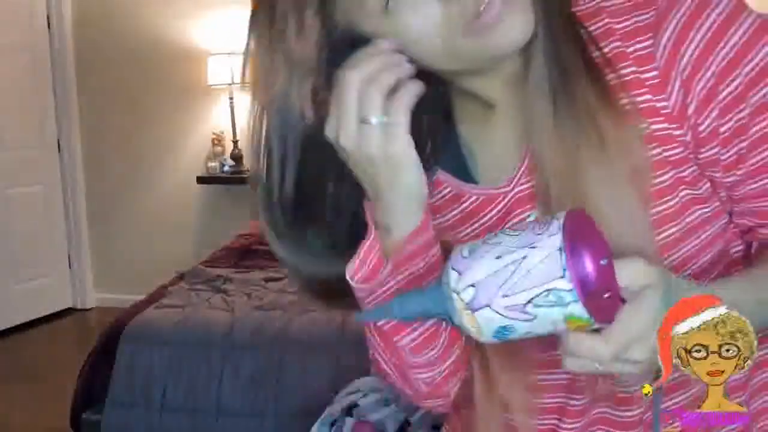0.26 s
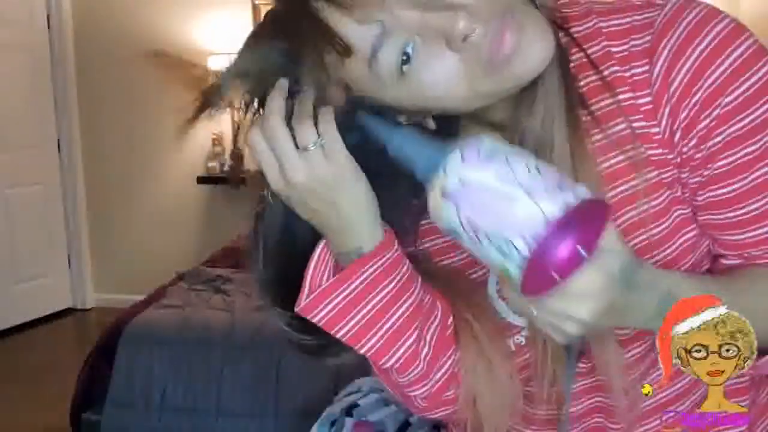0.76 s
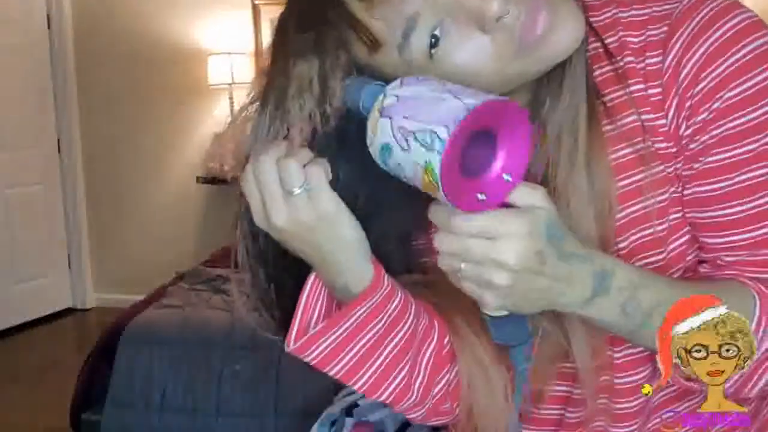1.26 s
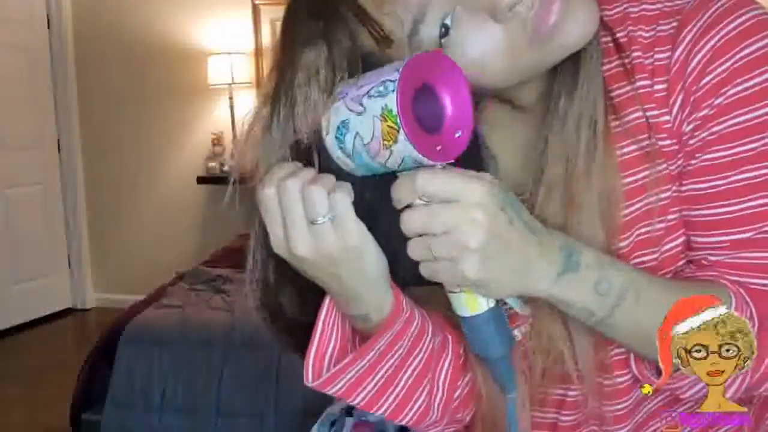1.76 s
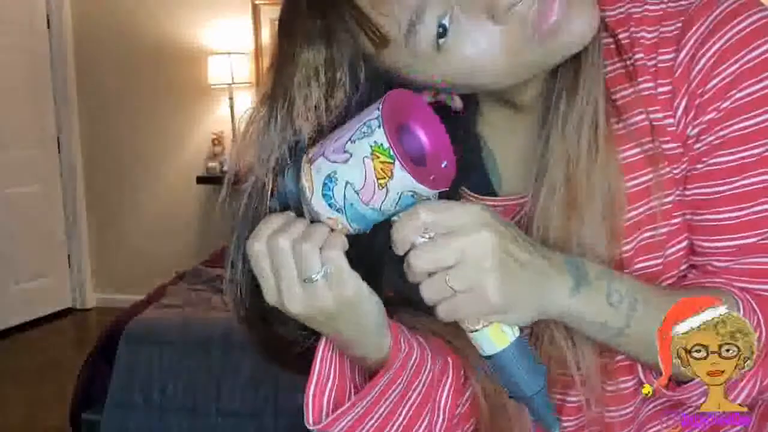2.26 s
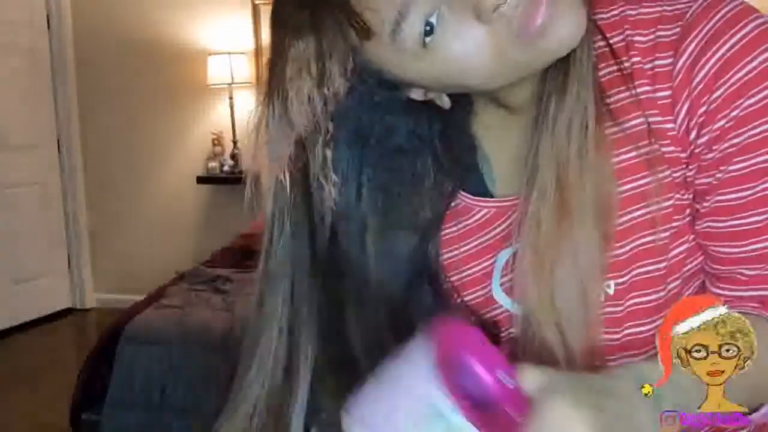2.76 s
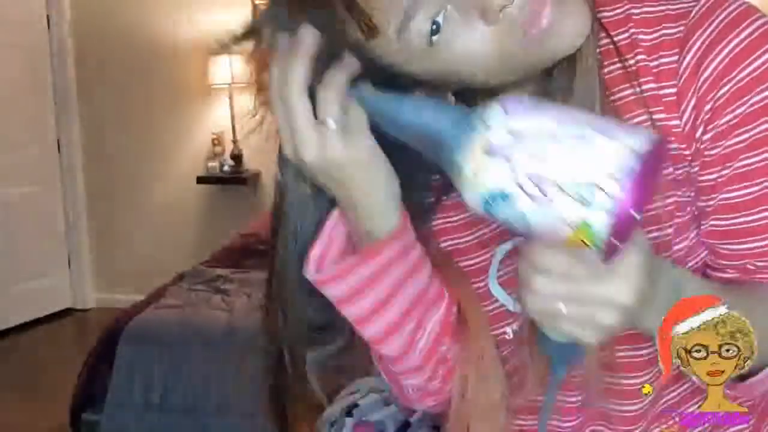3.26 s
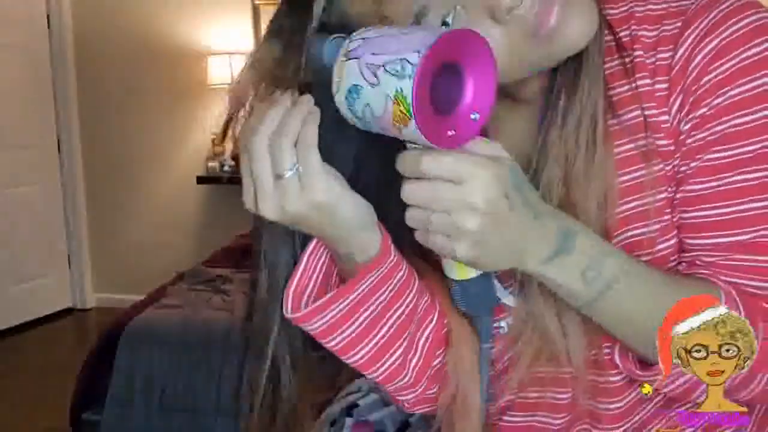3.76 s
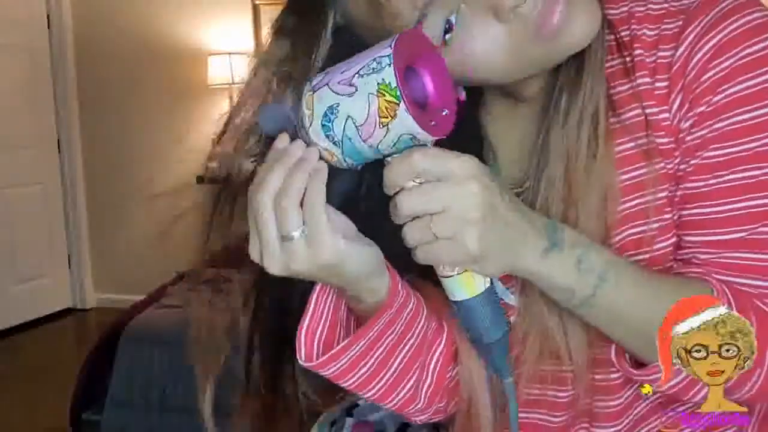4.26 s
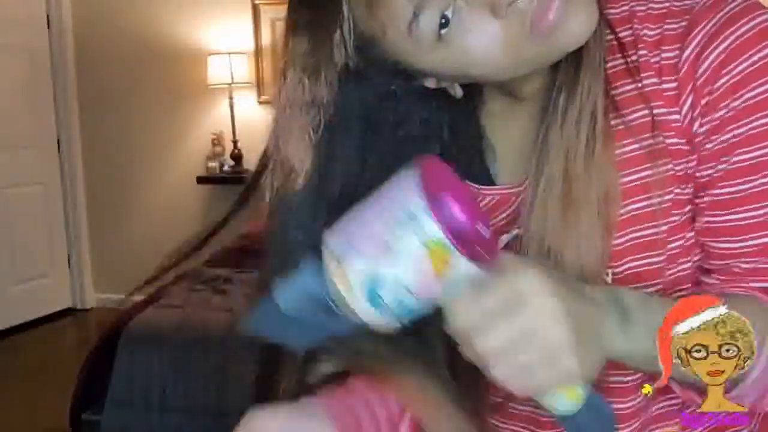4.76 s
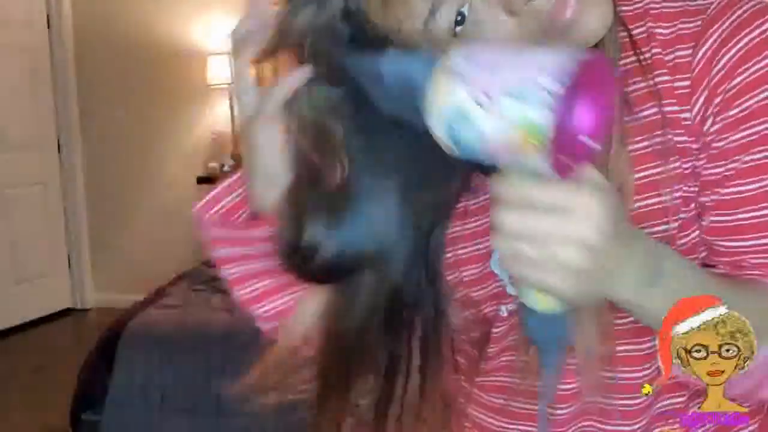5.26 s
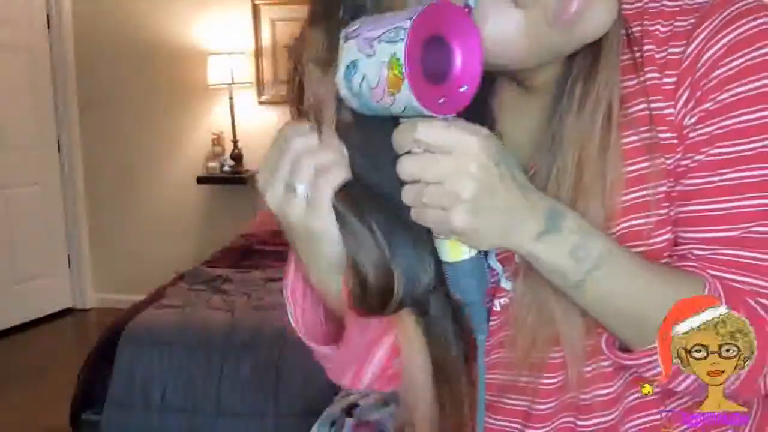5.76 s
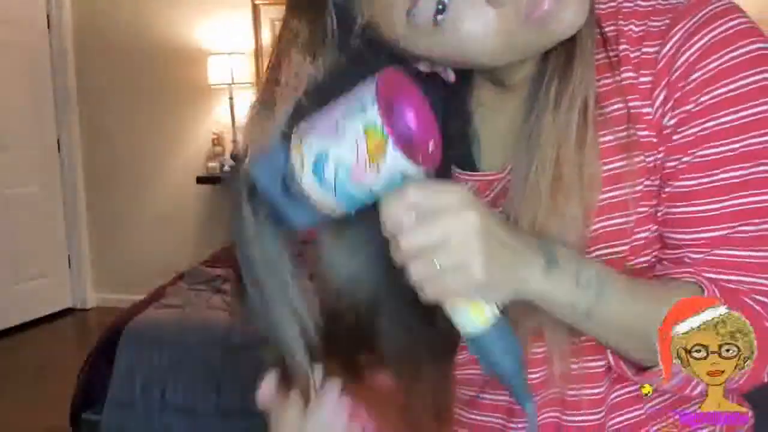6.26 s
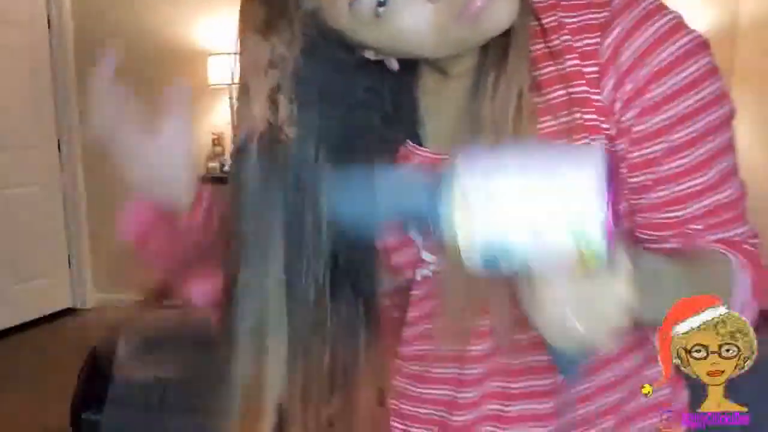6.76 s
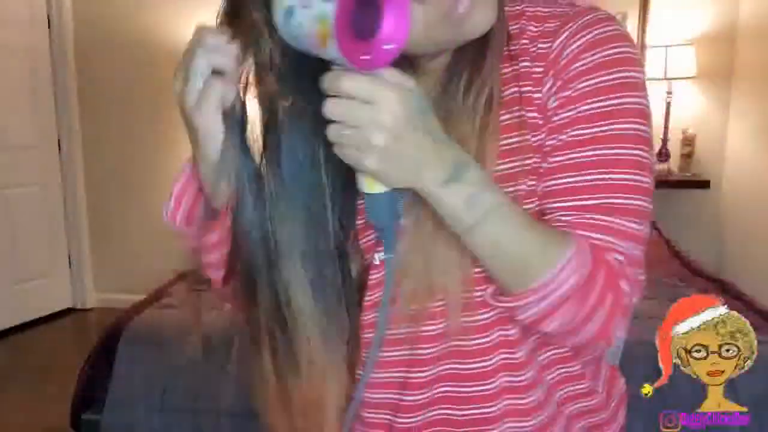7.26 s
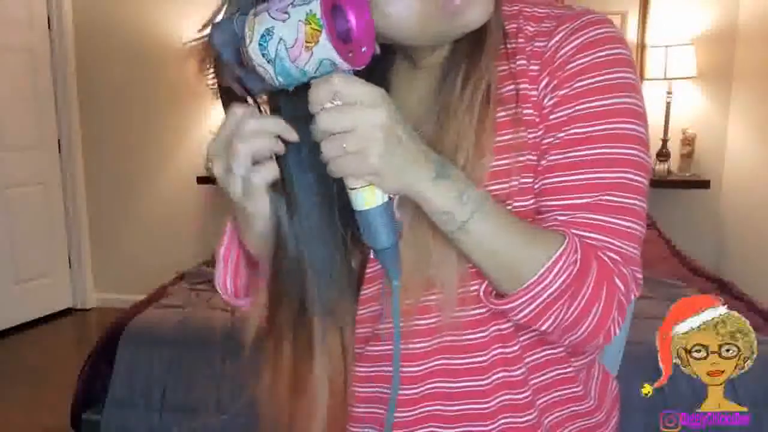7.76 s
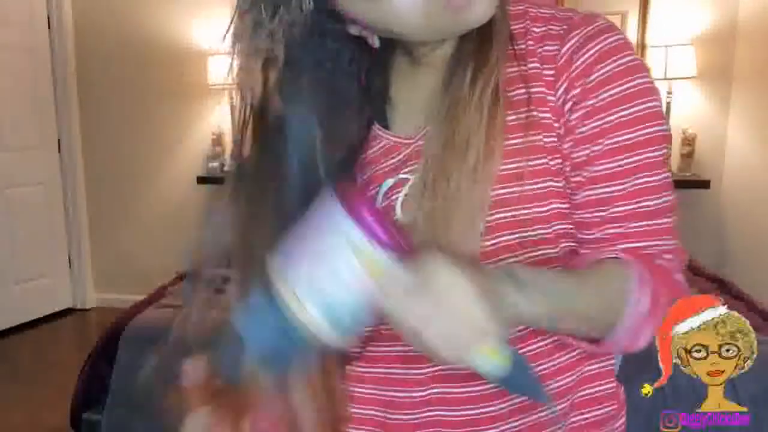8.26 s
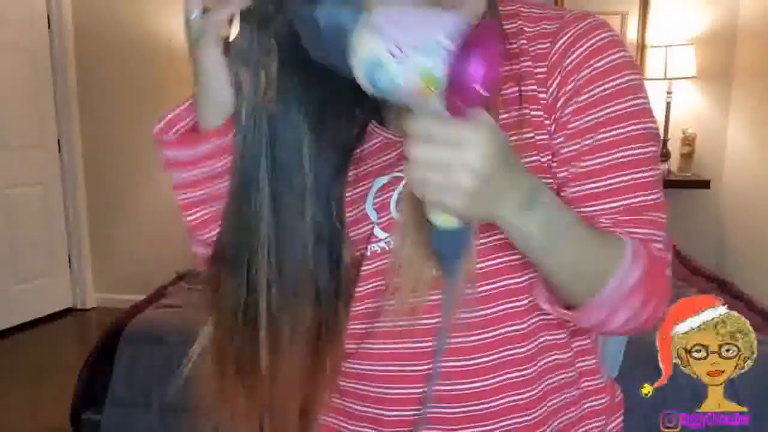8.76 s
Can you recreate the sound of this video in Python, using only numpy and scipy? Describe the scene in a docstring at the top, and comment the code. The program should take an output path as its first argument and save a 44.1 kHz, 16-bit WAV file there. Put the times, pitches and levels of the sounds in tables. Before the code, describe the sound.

A hair dryer clicks on with a quick rising chirp, then roars steadily close by, its hiss swelling as the nozzle sweeps past.

```python
"""A low rumble and drone are heard first, then a click and the chirp of a hair dryer being switched on.
Its motor runs up, whining at once, eight and twelve times its turning rate; turbulence roars in the duct
and swells as the nozzle is waved about a head of long hair in a soft bedroom. Shaped noise makes the air,
phase summed from motor speed makes the tones, and two microphone ports have each their treble colour."""
import sys
import numpy as np
from scipy import signal
from scipy.fft import rfft, irfft
from scipy.io import wavfile
from scipy.ndimage import map_coordinates

SR = 44100
rng = np.random.default_rng(int(sys.argv[2]) if len(sys.argv) > 2 else 0)


def store_wav(level_fs):
    """Save 16-bit WAV to argv[1]."""
    pcm = np.round(np.clip(np.atleast_2d(level_fs), -1, 1) * 32767)
    wavfile.write(sys.argv[1], SR, pcm.T.astype(np.int16))


N = 396900
TIME_S = np.arange(N) / SR
HZ = np.maximum(np.fft.rfftfreq(N, 1 / SR), 1)
SIDES = np.array([[1], [-1]])   # left, right


def amp(db):
    """Decibel law: twenty decibels are a tenfold amplitude."""
    return 10 ** (np.asarray(db) / 20)


def rms_one(x):
    """Normalisation: scale to a root-mean-square of 1."""
    return x / np.sqrt(np.mean(x ** 2) + 1e-20)


def in_time(rows):
    """Linear interpolation: the columns of a time table at every sample."""
    s, *columns = np.transpose(rows)
    return [np.interp(TIME_S, s, c) for c in columns]


def at_hz(points, hz):
    """Logarithmic pitch scale: a spectrum table read along log frequency."""
    table = np.array(points)
    return np.interp(np.log(hz), np.log(table[:, 0]), table[:, 1])


def drift(rate_hz):
    """Low-pass noise: a random fluctuation of spread 1, slowed by two equal poles."""
    r = np.exp(-80 * np.pi * rate_hz / SR)   # one step is 40 samples
    white = rng.standard_normal(N // 40 + 2002)
    slow = signal.lfilter([1], [1, -2 * r, r * r], white)[2000:]
    return np.interp(np.arange(N) / 40, np.arange(len(slow)), rms_one(slow))


def bell(hz, width_hz):
    """Resonance curve: 1 at the centre, half at the edges of the width."""
    return 1 / (1 + (2 * (HZ - hz) / width_hz) ** 2)


def resonate_twice(x, hz, width_hz):
    """Damped resonance: a pole pair rings at one frequency, applied twice for steeper skirts."""
    r = np.exp(-np.pi * width_hz / SR)
    for twice in range(2):
        x = signal.lfilter([1, 0, -1], [1, -2 * r * np.cos(2 * np.pi * hz / SR), r * r], x)
    return x


# coherence of the two ports: (frequency [Hz], left-right correlation [-1 to 1])
PORT_LIKENESS = [(60, 1), (120, 1), (240, 0.94), (480, 0.79), (950, 0.52), (1890, 0.37), (3770, 0.043),
                 (7520, 0.087), (15000, 0.01)]


def stereo_noise(colour_db):
    """Spatial coherence: spectra of two noises, alike in the bass and nearly unrelated in the treble."""
    mid, side = rfft(rng.standard_normal((2, N)))
    alike = np.clip(at_hz(PORT_LIKENESS, HZ), -1, .97)
    return amp(colour_db) * (np.sqrt(1 + alike) * mid + np.sqrt(1 - alike) * side * SIDES)


WAVING_HZ = 2.0   # how fast the pattern of reflections shifts


def reflections(x, t60_s, echo_db, count):
    """Reverberation: direct sound plus dying echo patterns, reweighted slowly as the dryer moves."""
    weights = np.array([drift(WAVING_HZ) for k in range(count)])
    weights = weights / np.sqrt(np.sum(weights ** 2, axis=0))
    decay = amp(-60 * TIME_S / t60_s)
    heard, out = rfft(x), x
    for weight in weights:
        echoes = irfft(stereo_noise(0), N) * decay
        response = rfft(echoes) / np.sqrt(2 * np.sum(decay ** 2))
        out = out + amp(echo_db) * weight * irfft(heard * response, N)
    return out / np.sqrt(1 + amp(2 * echo_db))


def tone(phase, level_db, fade_db, rate_hz, left_db, lead_rad=0):
    """Multipath interference: strength and phase waver in each port as the paths through the room change."""
    ports = []
    for side in SIDES:
        strength = amp(fade_db * drift(rate_hz))
        ports.append(strength * np.sin(phase + lead_rad * side / 2 + fade_db / 4 * drift(rate_hz)))
    return rms_one(np.array(ports)) * amp(level_db + left_db * SIDES / 2)


# low end, before the rumble wavers: (time [s], hum bands [dB rms], broad rumble [dB rms])
RUMBLE_LEVELS = [(0, -57, -70), (.45, -59, -68), (1, -56, -61), (1.4, -59, -76), (1.58, -66, -71),
                 (2.9, -70, -62), (3.2, -67, -59), (3.55, -68, -66), (4.6, -64, -67.5), (4.66, -63, -56.5),
                 (5.2, -60.5, -56.5), (6.5, -66, -55.5), (7.2, -55.5, -58), (7.3, -60, -61), (9, -60, -55)]
# spectrum of the rumble, cut a further 60 dB above 400 Hz: (frequency [Hz], relative level [dB])
RUMBLE_SPECTRUM = [(20, -20), (40, -0.5), (80, -7), (130, -1), (200, 1), (280, 3.5), (320, -48), (400, -32)]
# hum resonances: (centre [Hz], width [Hz], relative level [dB])
HUM_BANDS = [(44, 13, -1.5), (77.6, 16, -0.5), (123, 35, -2.5), (152.6, 11, 0)]
# spectrum of the room and microphone hiss: (frequency [Hz], relative level [dB])
HUSH_SPECTRUM = [(200, -15), (300, -26), (380, -5), (470, -8), (560, -11), (700, -23), (1500, -16),
                 (2500, -23), (16000, -37)]
HUSH_DB = -75.5   # rms


def room():
    """Filtered noise: resonant hum bands, a wavering broad rumble and a steady faint hush."""
    hum_db, rumble_db = in_time(RUMBLE_LEVELS)
    bands = sum(amp(db) * bell(hz, width) for hz, width, db in HUM_BANDS)
    hum = rms_one(irfft(stereo_noise(0) * bands, N))
    rumble = rms_one(irfft(stereo_noise(at_hz(RUMBLE_SPECTRUM, HZ) - 60 * (HZ > 400)), N))
    hush = rms_one(irfft(stereo_noise(at_hz(HUSH_SPECTRUM, HZ)), N))
    return hum * amp(hum_db) + rumble * amp(rumble_db + 2.4 * drift(5.0)) + hush * amp(HUSH_DB)


# low drone, before it wavers: (time [s], frequency [Hz], fundamental [dB rms], octave [dB rms])
DRONE_COURSE = [(0, 77.2, -66, -70), (.35, 78.7, -59, -64), (.6, 75, -62, -75), (.8, 74.2, -75, -78),
                (1.1, 78.2, -71, -75), (1.45, 79.5, -66, -75), (1.6, 81, -88, -90), (9, 79.8, -88, -90)]


def drone():
    """Harmonic pair: a sine and its octave waver gently together, the same in both ports."""
    hz, db, octave_db = in_time(DRONE_COURSE)
    phase = 2 * np.pi * np.cumsum(hz) / SR
    pair = amp(db) * np.sin(phase) + amp(octave_db) * np.sin(2 * phase)
    return np.sqrt(2) * amp(1.5 * drift(3.2)) * pair


DRIVE_START_S, DRIVE_ATTACK_S = 0.162, 0.014
DRIVE_CHIRP_DB, DRIVE_CHIRP_S = -35, .015   # start level and time constant of the chirp's decay
DRIVE_HOLD_DB, DRIVE_FADE_FROM_S, DRIVE_FADE_DB_PER_S = -42.5, 0.41, 220


def drive_level():
    """Attack and decay: an opening chirp dies to a hold, which then fades."""
    since = TIME_S - DRIVE_START_S
    chirp = amp(DRIVE_CHIRP_DB) * np.exp(-np.maximum(since - DRIVE_ATTACK_S, 0) / DRIVE_CHIRP_S)
    hold = amp(DRIVE_HOLD_DB - DRIVE_FADE_DB_PER_S * np.maximum(TIME_S - DRIVE_FADE_FROM_S, 0))
    return np.clip(since / DRIVE_ATTACK_S, 0, 1) ** 3 * np.maximum(chirp, hold)


DRIVE_HZ, DRIVE_WIDTH_HZ = 9400, 350


def drive():
    """Narrow-band noise: the motor drive's switching whine is rough, and stronger on the left."""
    noise = rng.standard_normal((2, N))
    noise[1] += 0.38 * noise[0]
    whine = resonate_twice(noise, DRIVE_HZ, DRIVE_WIDTH_HZ)
    return np.array([rms_one(port) for port in whine]) * drive_level() * amp(3.3 * SIDES)


# slider click: (time [s], nominal level [dB])
SWITCH_CLICKS = [(0.164, -49)]


def switch():
    """Impulsive excitation: a thin plastic tick is a few ms of dying treble noise."""
    out = np.zeros((2, N))
    for s, db in SWITCH_CLICKS:
        treble = np.diff(rng.standard_normal((2, 443)), 2)   # differencing favours the treble
        tick = treble * np.exp(-np.arange(441) / SR / .002)
        start = round(s * SR)
        out[:, start:start + 441] += amp(db) * tick / 4
    return out


# motor speed, running up, then sagging when the air meets resistance: (time [s], speed [turns/s])
MOTOR_SPEED = [(.17, 170), (.232, 585), (.288, 948), (.303, 1050), (.325, 1250), (.34, 1300), (.36, 1315),
               (.5, 1322), (.65, 1338), (1.25, 1342.5), (1.36, 1319), (1.48, 1311.6), (1.62, 1322.5),
               (1.8, 1340.5), (2.33, 1343.3), (2.55, 1335.4), (3.05, 1350), (3.95, 1351.2), (4.4, 1349.5),
               (5.9, 1350.5), (6.8, 1348.3), (7.95, 1351.4), (8.1, 1338.5), (8.4, 1337.5), (9, 1340.5)]
FULL_TURNS = 1345   # turns per s at full speed


def speed():
    """Rotation rate: turns per second, nought until the first row of the table."""
    turns, = in_time(MOTOR_SPEED)
    return turns * (TIME_S > MOTOR_SPEED[0][0])


# passes of the nozzle: (centre [s], length [s], beam gain [dB], boom of the barrel that follows [dB])
NOZZLE_SWINGS = [(0.544, 0.94, 4, 6.5), (3.086, 0.85, 5, 3.5), (5.07, 0.42, 6, 0.5), (6.795, 0.41, 5, -1),
                 (8.592, 0.31, 6, 2.5)]
AIM_AWAY_DB = -1.14   # between swings


def aim():
    """Directivity: the beam's gain in dB rises in a smooth bump as the nozzle swings past."""
    gain_db = AIM_AWAY_DB
    for s, length, db, boom_db in NOZZLE_SWINGS:
        gain_db = gain_db + db * np.cos(np.pi * np.clip((TIME_S - s) / length, -.5, .5)) ** 2
    return gain_db


# after a swing the intake faces the ports and the barrel booms, then it tips away
BOOM_AFTER_S, BOOM_RISE_DB_PER_S, BOOM_SAG_DB_PER_S, BOOM_LEAST_DB = 0.4, 13, 4.5, -11.5


def boom():
    """Cavity resonance: the barrel's boom, in dB, rises around each swing's end and then sags."""
    peaks = []
    for s, length, db, boom_db in NOZZLE_SWINGS:
        late = TIME_S - s - BOOM_AFTER_S
        peaks.append(boom_db + np.minimum(BOOM_RISE_DB_PER_S * late, -BOOM_SAG_DB_PER_S * late))
    return np.maximum(np.max(peaks, axis=0), BOOM_LEAST_DB)


LEFT_LEAD_S = .00007   # the straight sound reaches the left port first
# bounce off a near surface, later as the nozzle swings out
BOUNCE_S, BOUNCE_S_PER_DB, BOUNCE_DB = .0011, .00007, -3.0
BEAM_TOP_HZ = 10000   # above this the two ports hear unrelated parts of the jet


def beam(colour_db, aim_db):
    """Comb filtering: one jet noise meets its bounce, whose moving delay draws sliding fringes."""
    jet = rng.standard_normal(N)
    late = np.arange(N) - SR * (BOUNCE_S + BOUNCE_S_PER_DB * aim_db)
    bounce = map_coordinates(jet, [late], order=3, mode="wrap")
    jet = rms_one(jet + amp(BOUNCE_DB) * bounce)
    lead = np.exp(1j * np.pi * HZ * LEFT_LEAD_S * SIDES)
    shared = 1 / (1 + (HZ / BEAM_TOP_HZ) ** 12)
    apart = np.sqrt(1 - shared) * stereo_noise(colour_db)
    return irfft(np.sqrt(2 * shared) * rfft(jet) * lead * amp(colour_db) + apart, N)


# broad spectrum of the turbulence: (frequency [Hz], relative level [dB])
ROAR_SPECTRUM = [(120, -54), (200, -14.5), (310, -15.5), (500, -7.5), (820, -2.5), (1100, 0.5), (1700, -1),
                 (2200, 0.5), (3300, 0), (4000, -3.5), (4500, -5.5), (5000, -5), (5600, -4), (6400, -2),
                 (7400, -1), (8900, -4.5), (10000, -6.5), (11500, -6.5), (13500, -4.5), (14800, -3.5),
                 (15500, -2), (16000, -16)]
# duct resonances: (centre [Hz], width [Hz], gain [dB])
DUCT_RESONANCES = [(434, 273, 9.5), (3710, 930, 7), (8970, 1150, 3), (14500, 1200, 0.5)]
# treble colour of the ports: (frequency [Hz], left minus right [dB])
PORT_COLOUR = [(210, 0), (330, 2.5), (770, -0.5), (1800, 2.5), (3000, 3.5), (4200, 2.5), (5200, 0.5),
               (6400, -0.5), (7400, -1.5), (8300, 9.5), (9300, 9.5), (10500, 4), (12000, 2.5), (15000, 1.5)]


def air_colour():
    """Source and filter: the turbulent spectrum, raised by the duct and coloured by each port, in dB."""
    duct_db = sum(db * bell(hz, width) for hz, width, db in DUCT_RESONANCES)
    return at_hz(ROAR_SPECTRUM, HZ) + duct_db + at_hz(PORT_COLOUR, HZ) * SIDES / 2


NEAR_T60_S, NEAR_DB = 0.098, -3   # reflections off head, hair and hand
BEAM_SHARE, BEAM_PER_DB = .12, .16   # energy straight from the nozzle, and its growth per dB of aim


def turbulence(aim_db):
    """Direct and scattered fields: their energy balance follows the aim; rms 1 in 11-15.5 kHz."""
    colour_db = air_colour()
    scattered = reflections(irfft(stereo_noise(colour_db), N), NEAR_T60_S, NEAR_DB, count=3)
    straight = np.clip(BEAM_SHARE + BEAM_PER_DB * aim_db, 0, .9)
    noise = rfft(np.sqrt(1 - straight) * scattered + np.sqrt(straight) * beam(colour_db, aim_db))
    treble = irfft(noise * (HZ > 11000) * (HZ < 15500), N)
    return noise / np.sqrt(np.mean(treble ** 2))


FLOW_POWER = 1.32   # the roar's amplitude grows with this power of motor speed
# air at full speed, before aim and flicker: (time [s], hiss [dB], body of the roar over the hiss [dB])
AIR_FLOW = [(.2, -39.5, -6.5), (.23, -36.5, -7), (.26, -35, -10.5), (.29, -40.5, -2), (.32, -43.5, 2.5),
            (.38, -42, 0.5), (.45, -41, 2), (.9, -38.5, 1.5), (1.55, -42.5, 2.5), (2.3, -37.5, -1.5),
            (2.82, -43.5, 4), (3.3, -40, 3.5), (3.55, -38, 0.5), (3.87, -42.5, 2.5), (4.35, -44, 4.5),
            (4.6, -44.5, 6.5), (4.66, -42, -0.5), (5.2, -39.5, -1), (5.5, -43, 0), (5.85, -41.5, -3),
            (6.3, -41, -1), (6.9, -42, 0.5), (7.1, -41.5, -1.5), (7.55, -42, -2.5), (8, -41, -2),
            (8.35, -44, 2), (9, -42.5, -0.5)]
# slow change of colour: (time [s], level of the dip near 5 kHz [dB], level near 350 Hz [dB])
AIR_SHADE = [(.2, 1, 4.5), (.45, -3, 9.5), (.7, -1.5, 6), (1.2, -8.5, 0.5), (1.9, -1, -1.5), (2.3, -3, -11),
             (3, 1.5, 7.5), (3.6, -2.5, 0), (4.6, 1, 1), (5.5, 1.5, 4.5), (6.6, 2.5, 1), (7.6, 3.5, 3.5),
             (9, 0, 3)]
# how far each frequency follows the body column: (frequency [Hz], share [ratio])
BODY_WEIGHT = [(500, 0), (800, 1), (1800, 1), (3000, 1), (4320, 0.97), (5440, 0.8), (7000, 0.98),
               (11000, 0.99)]
# how far it follows the boom: (frequency [Hz], share [ratio])
BOOM_WEIGHT = [(200, 0), (330, 0), (480, 1), (650, 0), (900, 0)]
# how far it follows the dip column of the shade: (frequency [Hz], share [ratio])
DIP_WEIGHT = [(3400, 0.15), (4320, 0.74), (5440, 0.27), (6850, 0.013)]
# how far it follows the low column of the shade: (frequency [Hz], share [ratio])
LOW_WEIGHT = [(250, 0.056), (340, 0.72), (430, 0.57), (540, 0)]
# how far the left port follows the aim: (frequency [Hz], share [ratio])
LEFT_AIM_WEIGHT = [(900, 0), (2300, 0.23), (3430, 0.91), (4320, 0.73), (5440, 0.47), (6850, 1.5),
                   (8640, 1.58), (10880, 0.1), (13700, 0)]
# how far the right port follows the aim: (frequency [Hz], share [ratio])
RIGHT_AIM_WEIGHT = [(900, 0), (2300, 0.13), (3430, 0.62), (4320, 0.79), (5440, 0.43), (6850, 0.53),
                    (8640, 0.35), (10880, 0.51), (13700, 0)]
# the low roar is the more ragged: (frequency [Hz], share of the flicker [ratio])
FLICKER_WEIGHT = [(300, 2.1), (1500, 1.2), (2500, 1.3), (6000, 1.7), (12000, 0.21)]
# colour while the flow is still thin, gone once it has built: (frequency [Hz], gain [dB])
THIN_FLOW_COLOUR = [(500, 4), (900, -2), (1500, 1), (2150, 5), (2720, -5), (3430, -4), (4320, 0), (5440, 0),
                    (7000, 1)]
THIN_UNTIL_S, THIN_FADE_S = 0.265, 0.033


def air(flicker_db, gust_db):
    """Aerodynamic noise: level grows as a power of speed, and each third of an octave has its own swell."""
    aim_db = aim()
    noise = turbulence(aim_db)
    hiss_db, body_db = in_time(AIR_FLOW)
    hiss_db = hiss_db + 20 * FLOW_POWER * np.log10(speed() / FULL_TURNS + 1e-3)
    # level curves are kept at every 50th sample
    curves = [hiss_db, body_db, boom(), aim_db, *in_time(AIR_SHADE), gust_db * drift(6)]
    hiss_db, body_db, boom_db, aim_db, dip_db, low_db, gust = [curve[::50] for curve in curves]
    thin = np.clip(1 - (TIME_S[::50] - THIN_UNTIL_S) / THIN_FADE_S, 0, 1)
    place = 3 * np.log2(HZ / 170)   # thirds of an octave above 170 Hz
    out = np.zeros((2, N))
    for k in range(21):
        window = np.cos(np.pi / 2 * np.clip(place - k, -1, 1)) ** 2   # overlapping bands sum to one
        hz = 170 * 2 ** (k / 3)
        swell_db = hiss_db + gust + at_hz(THIN_FLOW_COLOUR, hz) * thin
        swell_db = swell_db + at_hz(BOOM_WEIGHT, hz) * boom_db + at_hz(BODY_WEIGHT, hz) * body_db
        swell_db = swell_db + at_hz(DIP_WEIGHT, hz) * dip_db + at_hz(LOW_WEIGHT, hz) * low_db
        swell_db = swell_db + flicker_db * at_hz(FLICKER_WEIGHT, hz) * drift(18.3)[::50]
        band = irfft(noise * window, N)
        for port, weight in enumerate([LEFT_AIM_WEIGHT, RIGHT_AIM_WEIGHT]):
            gain = amp(swell_db + at_hz(weight, hz) * aim_db)
            out[port] += np.interp(np.arange(N), 50 * np.arange(len(gain)), gain) * band[port]
    return out


# twelve-per-turn whistle of the run-up, before reflections: (time [s], level [dB rms])
WHISTLE_LEVEL = [(.18, -80), (.212, -67), (.222, -43), (.243, -39.5), (.255, -41), (.295, -36.5),
                 (.304, -27), (.328, -20), (.345, -27), (.37, -40), (.5, -80)]
# once-per-turn tone: (time [s], level [dB rms], left minus right [dB])
FIRST_TONE_LEVEL = [(.2, -80, 0), (.235, -68, 0), (.26, -57, 0), (.275, -52, 0), (.295, -56, 0),
                    (.32, -50, -2), (0.4, -53, -0.5), (0.47, -56, 4), (2.38, -44, 4), (2.67, -55, -5),
                    (2.79, -48, 5.5), (2.87, -54, -2.5), (2.96, -42, -2.0), (3.1, -47, 0), (3.18, -40, -2),
                    (3.29, -52, 0), (3.45, -44, 0), (3.66, -45, 0), (3.8, -39, 0), (4.4, -40.5, 4),
                    (4.52, -47, 1), (4.59, -38, 2), (4.64, -44, 1), (4.98, -43.5, -1), (5.19, -50, 0),
                    (5.36, -42, -1), (5.57, -49.5, 5), (6.29, -46, 4), (6.67, -48.5, -6), (7.25, -51, 11),
                    (8.09, -53.5, 1), (8.18, -51, -10), (8.26, -62, 4.5), (8.4, -50, -9), (8.47, -58, 4.0),
                    (8.71, -55, -0.5), (8.81, -51.5, 7.5), (9.0, -58, -2.5)]
# eight-per-turn tone, before its gate near full speed: (time [s], level [dB rms], left minus right [dB])
EIGHTH_TONE_LEVEL = [(0.4, -69, 6), (0.48, -65, 3), (0.54, -51, 5), (0.74, -48, 9), (0.84, -61, 5),
                     (1.0, -55, -1), (1.26, -46, -2), (1.38, -47, 10), (1.5, -48, 9), (1.56, -58, 8),
                     (1.62, -53, 8), (1.7, -59, 8), (1.8, -45, 5), (1.86, -56, 4), (1.93, -43, 2),
                     (2.1, -52, -3), (2.3, -49, 2), (2.46, -69, 4), (2.54, -48, 9), (2.66, -50, -1),
                     (2.74, -35.5, 1), (2.86, -57, 4), (3.0, -45, 4), (3.1, -56, -2), (3.24, -45, -3),
                     (3.42, -44, 11), (3.52, -50, 7), (3.62, -45, 10), (3.68, -63, 8), (3.8, -55, 7),
                     (3.9, -49, 7), (4.13, -53, 2), (4.2, -69, 4), (4.48, -41, -4), (4.64, -53, 2),
                     (5.1, -49, 9), (5.4, -63, 2), (5.56, -51, 11), (5.75, -46, 9), (5.87, -58, 2),
                     (5.98, -38.5, 6), (6.2, -50, 10), (6.29, -41, 15), (6.38, -55, 5), (6.54, -44, -3),
                     (6.82, -60, -1), (6.96, -43, 8), (7.06, -57, 15), (7.22, -53, 2), (7.28, -65, 4),
                     (7.4, -49, 6), (7.5, -60, 4), (7.62, -50, 12.5), (7.95, -48.5, 9), (8.12, -46, 10),
                     (8.3, -54, 6), (8.37, -46, 2), (8.55, -53, 4), (8.64, -60, 3), (8.68, -48, 3),
                     (8.72, -62, 2), (8.8, -51, 2), (8.94, -58, 0), (9, -48, 0)]
TONES_FROM, TONES_OVER = .95, .025   # shares of full speed over which the eighth tone comes in
ROOM_T60_S, ROOM_DB = .25, 1.0   # reflections off the walls


def motor():
    """Rotational harmonics: unbalance once a turn, pole and blade tones at eight and twelve a turn."""
    turns = speed()
    first_db, first_left_db = in_time(FIRST_TONE_LEVEL)
    eighth_db, eighth_left_db = in_time(EIGHTH_TONE_LEVEL)
    whistle_db, = in_time(WHISTLE_LEVEL)
    phase = 2 * np.pi * np.cumsum(turns) / SR
    first = tone(phase, first_db, 2.8, rate_hz=16.0, left_db=first_left_db)
    eighth = tone(8 * phase, eighth_db, 3.4, rate_hz=20.0, left_db=eighth_left_db, lead_rad=1.15)
    whistle = tone(12 * phase, whistle_db, 2.0, rate_hz=40.0, left_db=.5, lead_rad=1.5)
    settled = np.clip((turns / FULL_TURNS - TONES_FROM) / TONES_OVER, 0, 1)
    return first + eighth * settled + reflections(whistle * (turns > 0), ROOM_T60_S, ROOM_DB, count=1)


# narrow howl of the air path while the flow builds: (time [s], frequency [Hz], level [dB rms])
HOWL_COURSE = [(.225, 2980, -70), (.245, 3000, -49), (.256, 3000, -53), (.265, 3020, -44), (.28, 3060, -41),
               (.293, 3060, -44), (.298, 3540, -42), (.315, 3560, -42), (.328, 3360, -39), (.35, 3400, -44),
               (.42, 3500, -70), (.5, 3500, -100)]


def howl():
    """Flow-excited resonance: a rough, wavering near-tone hops in frequency as the flow builds."""
    hz, level_db = in_time(HOWL_COURSE)
    phase = 2 * np.pi * np.cumsum(hz) / SR
    return tone(phase, level_db, 3.6, rate_hz=41.0, left_db=-3.0) * (speed() > 0)


# narrow bands of the nozzle: (centre [s], length [s], frequency [Hz], level before swell and flicker [dB rms])
NOZZLE_RINGS = [(0.588, .6, 3540, -40), (0.662, .56, 2150, -43), (0.597, .5, 2650, -48),
                (.75, .8, 4050, -55), (1.702, 1.4, 3740, -51), (2.85, .4, 3700, -43), (3.15, .5, 3610, -40),
                (5.068, 0.19, 3500, -45), (6.796, 0.27, 3730, -47), (8.548, .35, 3670, -47)]
NOZZLE_WIDTH_HZ, NOZZLE_FLICKER_DB = 380, 1.5


def nozzle():
    """Resonance under broadband excitation: air noise rings in narrow bands that swell, die and flicker."""
    out = np.zeros((2, N))
    mix = np.array([[1, 0.54, 0.2], [1, 0.25, 0.39]])   # each port's share of three noises
    for s, length, hz, db in NOZZLE_RINGS:
        near = slice(max(int((s - length / 2) * SR), 0), int((s + length / 2) * SR))
        t = TIME_S[near]
        ring = resonate_twice(mix @ rng.standard_normal((3, len(t))), hz, NOZZLE_WIDTH_HZ)
        swell = np.sqrt(np.abs(np.cos(np.pi * (t - s) / length)))
        out[:, near] += amp(db) * rms_one(ring) * swell
    return out * amp(NOZZLE_FLICKER_DB * drift(15.0))


# soft low thuds: (time [s], level before onset and decay [dB], frequency [Hz])
SOFT_THUDS = [(0.625, -43, 131), (0.715, -44, 132), (0.819, -47, 94.5), (5.321, -50, 140),
              (6.601, -38.5, 183), (6.783, -40.5, 127), (6.994, -41, 126), (7.085, -47, 160)]
THUD_T60_S = 0.25


def thuds():
    """Damped oscillation: soft pushes into a low resonance, the same in both ports."""
    out, t = np.zeros(N), np.arange(SR // 4) / SR
    for s, db, hz in SOFT_THUDS:
        onset = 1 - np.exp(-t / 0.0051)
        body = np.sin(2 * np.pi * hz * t) * amp(db - 60 * t / THUD_T60_S) * onset
        start = round(s * SR)
        out[start:start + len(t)] += body
    return out


def scene():
    """Superposition: the pressures of all sources add at the two ports."""
    still = room() + drone()
    start = drive() + switch()
    running = air(flicker_db=1.0, gust_db=.5) + motor() + howl() + nozzle()
    return still + start + running + thuds()


def record(dry):
    """Band limiting: an elliptic low-pass cuts the top steeply."""
    low_pass = signal.ellip(12, .5, 75, 15990, fs=SR, output="sos")   # ripple dB, stop-band dB, edge Hz
    return signal.sosfilt(low_pass, dry)


dry = scene()
out = record(dry)
store_wav(out)
```